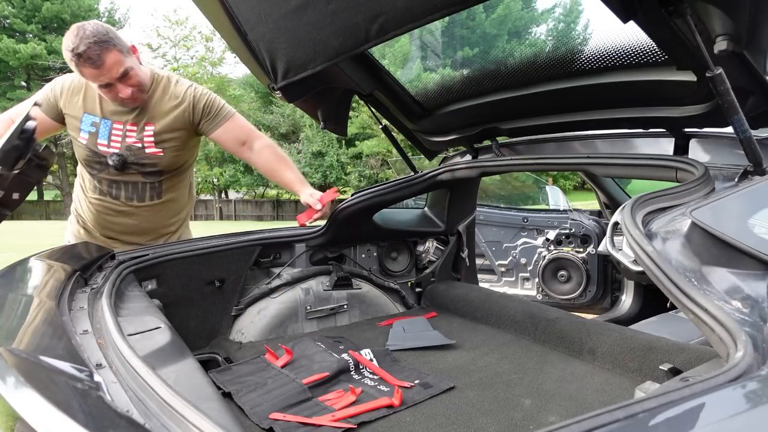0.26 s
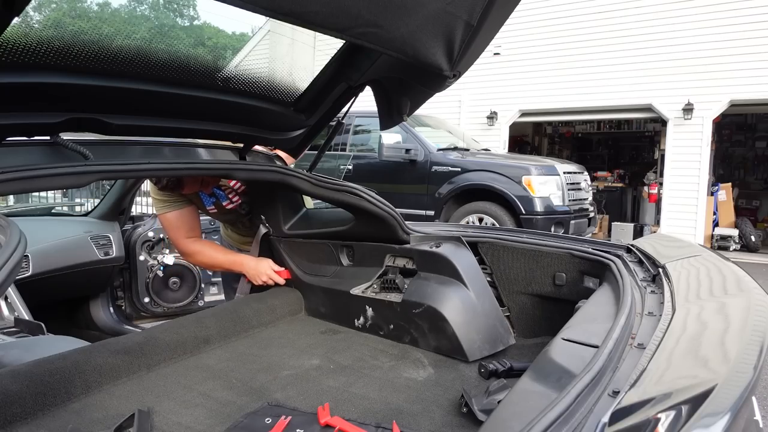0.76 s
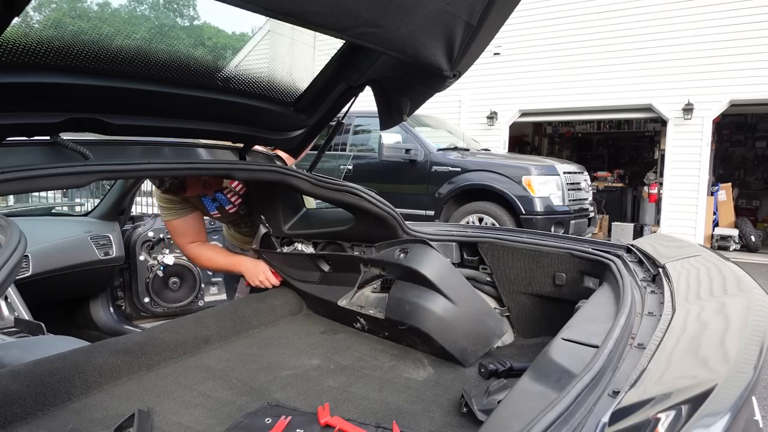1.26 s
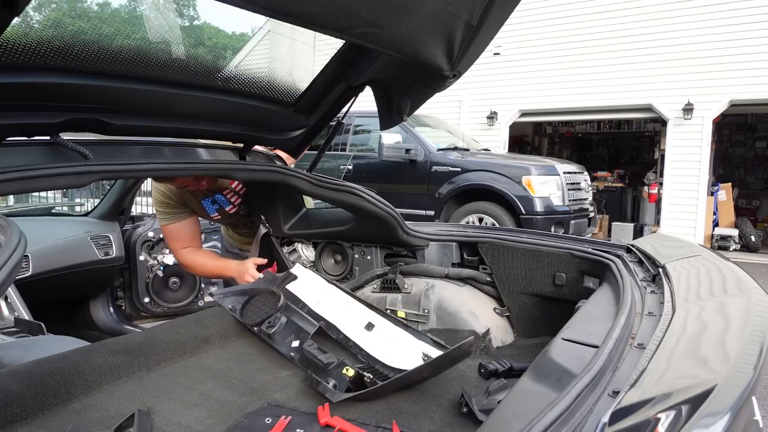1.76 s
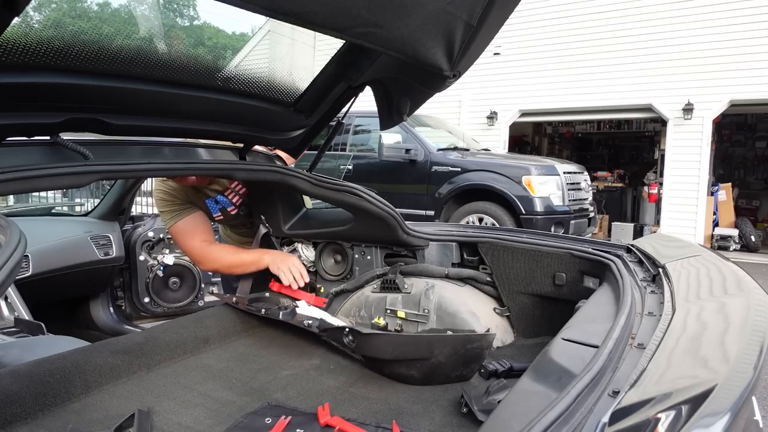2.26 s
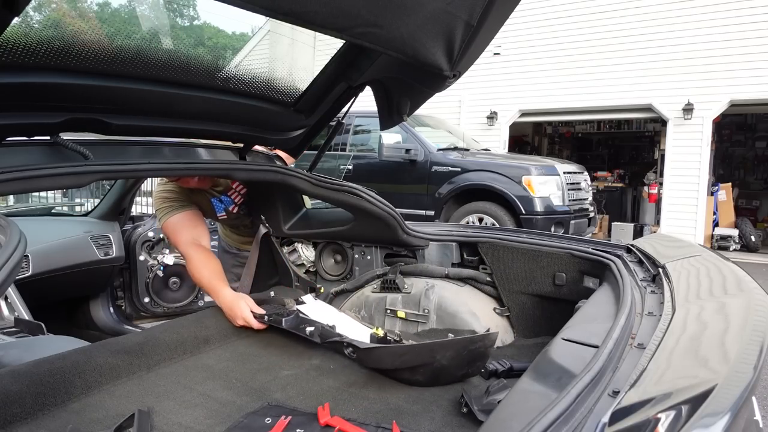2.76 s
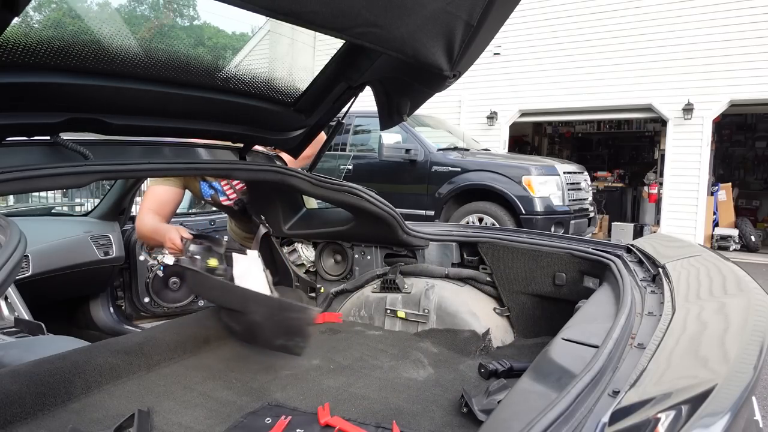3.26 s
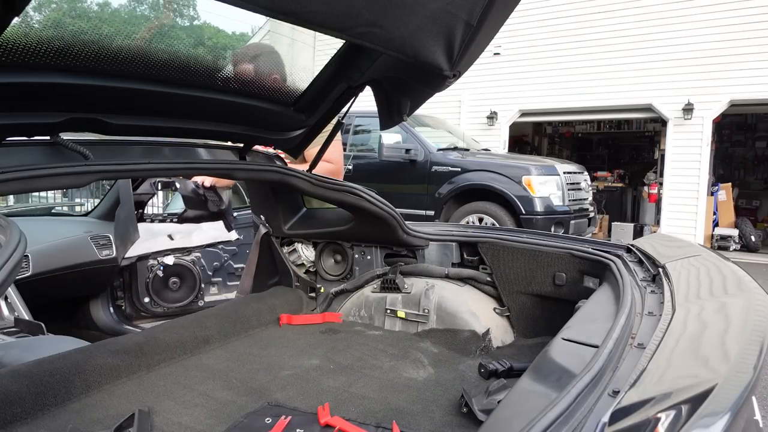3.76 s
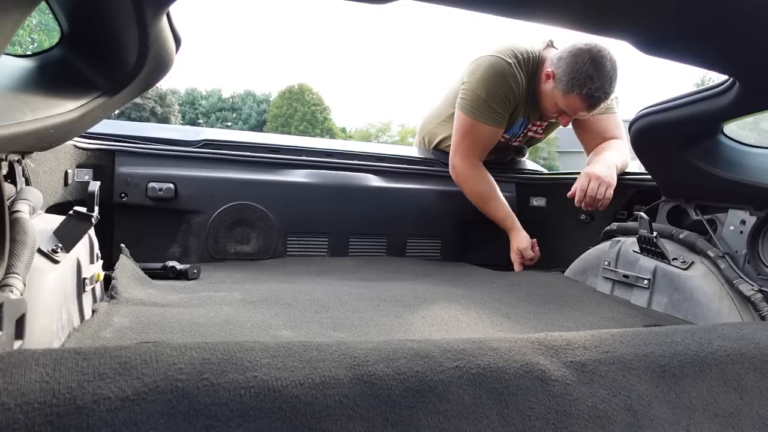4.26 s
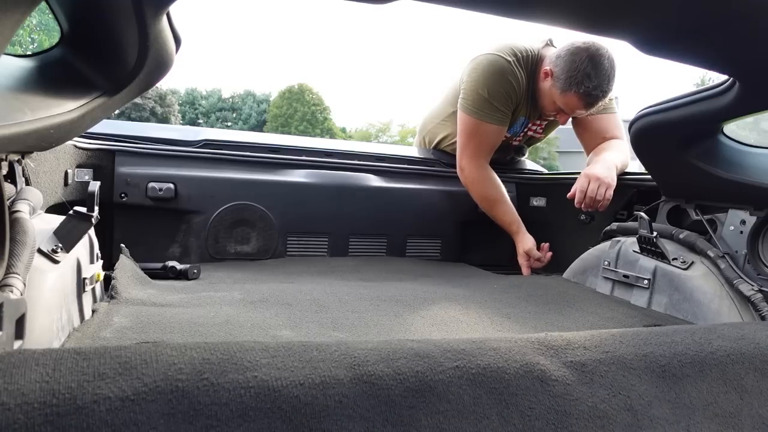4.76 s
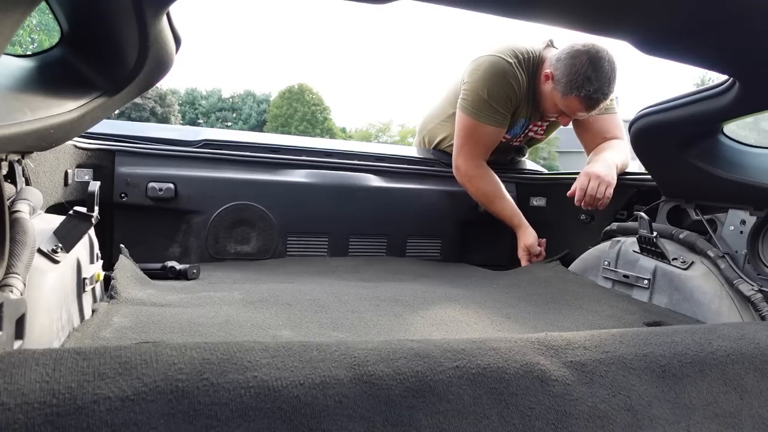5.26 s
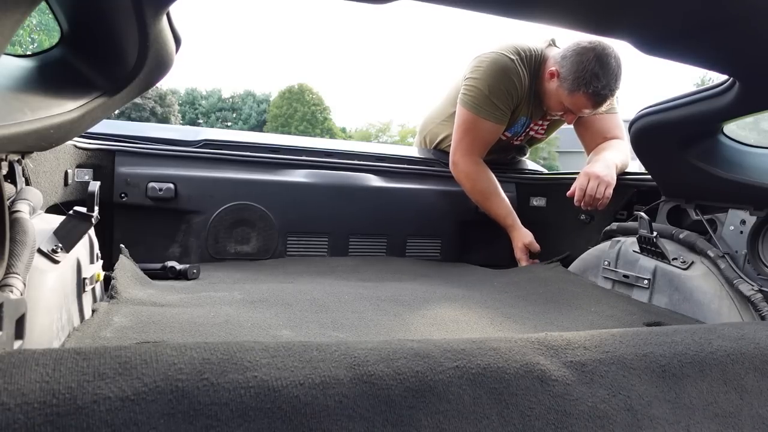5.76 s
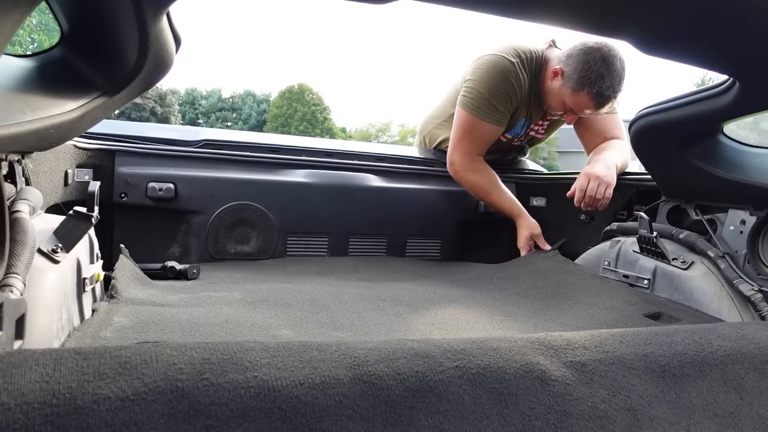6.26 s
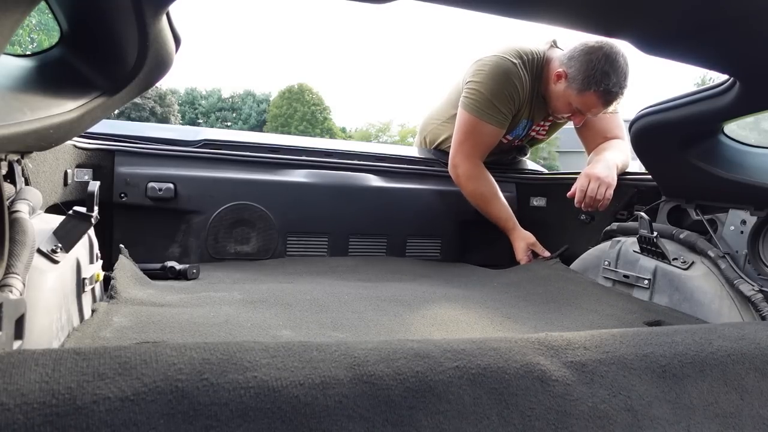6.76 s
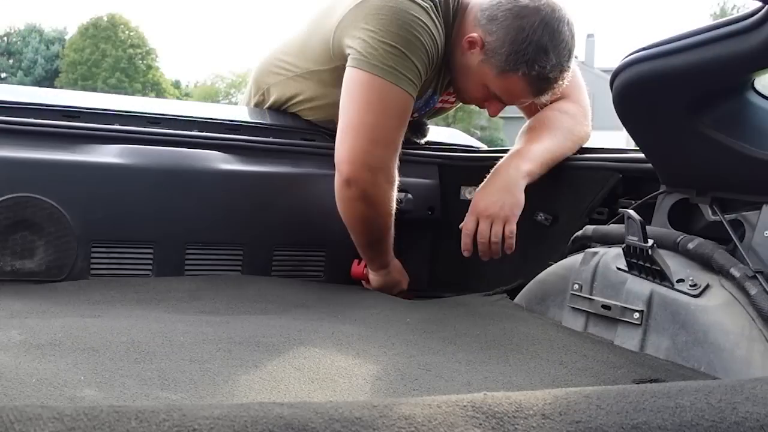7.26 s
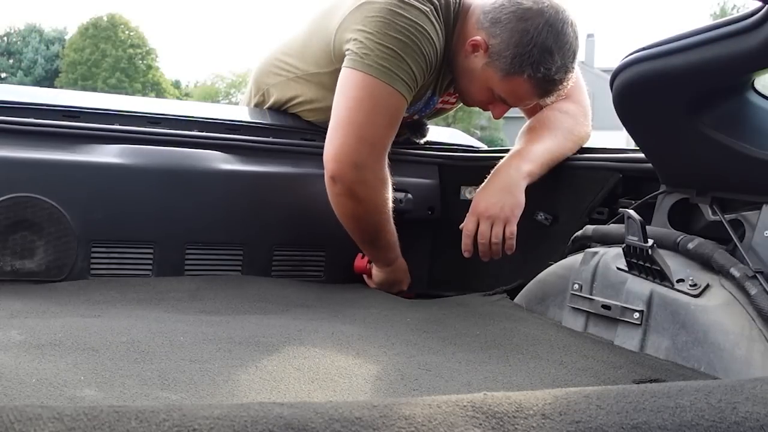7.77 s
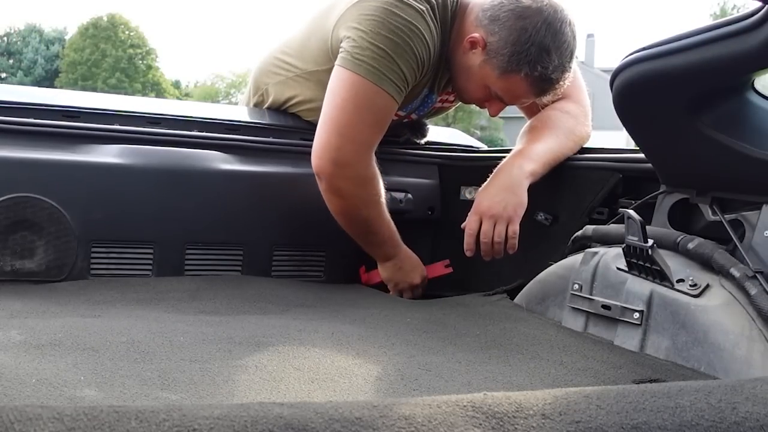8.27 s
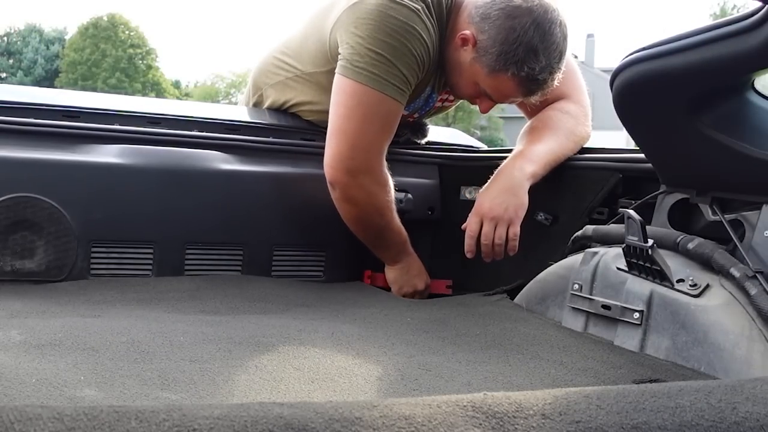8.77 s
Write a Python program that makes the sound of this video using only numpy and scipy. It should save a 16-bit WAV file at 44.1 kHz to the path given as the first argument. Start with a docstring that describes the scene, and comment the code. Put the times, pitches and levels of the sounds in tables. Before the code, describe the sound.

Plastic trim panels knock, crack and scrape loose in an open car boot, over faint traffic hum, thin crickets, then swelling cicada buzz.

```python
"""Outdoors on a driveway: tyre hum, rumble, rustling and thin crickets are faint until the level jumps up at
0.38 s. By hand, plastic trim panels are prised out of an open car boot: blows ring panel modes, clips snap as
noise cracks through the resonances of thin edges, and from 1.2 s edges scuff in jerky strokes of noise slips.
After each blow the rustle and traffic swell, then sink back. From 4 s the crickets give way to cicadas, noise
in narrow resonances, which surge after 7 s. The boot adds a short tail, and short echoes colour the scuffs and
the background."""
import sys
import numpy as np
from scipy import signal
from scipy.fft import rfft, irfft, next_fast_len
from scipy.io import wavfile

SR = 44100
rng = np.random.default_rng(int(sys.argv[2]) if len(sys.argv) > 2 else 0)


def generate_wav(signal):
    """Clip the signal to [-1, 1] and save it as 16-bit WAV at the path in sys.argv[1]."""
    frames = np.transpose(np.atleast_2d(signal))
    scaled = np.clip(frames, -1, 1) * 32767
    pcm = np.round(scaled).astype(np.int16)
    wavfile.write(sys.argv[1], SR, pcm)


N = 397782

# Resonances of thin plastic edges. Each row: frequency in Hz, width in Hz, level in dB.
PLASTIC = [(1500, 410, 4.5), (2604, 1470, 4), (3450, 1130, 8), (4100, 480, 7), (4690, 1420, 1.5),
           (5920, 660, 2.5), (6920, 880, -0.5), (8840, 1700, -2), (11400, 4300, -6.5), (14800, 1500, -19.5)]


def amp(db):
    """dB to gain."""
    return 10 ** (np.asarray(db) / 20)


def rms_one(x):
    """Scale to rms 1."""
    return x / np.sqrt(np.mean(x ** 2) + 1e-20)


def in_time(rows):
    """Curve columns at every sample; silent outside the rows."""
    s, *columns = np.transpose(rows)
    return [np.interp(np.arange(N) / SR, s, c, left=-150, right=-150) for c in columns]


def ramp(start_s, length_s):
    """A straight fade from 0 to 1."""
    return np.clip((np.arange(N) / SR - start_s) / length_s, 0, 1)


def drift(rate_hz):
    """Slow random wander of rms 1: noise through two equal poles, at a fortieth of the sample rate."""
    r = np.exp(-2 * np.pi * rate_hz * 40 / SR)
    noise = rng.standard_normal(N // 40 + 2002)
    slow = signal.lfilter([1], [1, -2 * r, r * r], noise)[2000:]   # skip the filter's settling
    return np.interp(np.arange(N) / 40, np.arange(len(slow)), rms_one(slow))


def coloured(spectrum):
    """Noise shaped by a spectrum of (Hz, dB per Hz) points; rms 1."""
    size = next_fast_len(N)
    hz = np.maximum(np.arange(size // 2 + 1) * SR / size, 1)
    at_hz, db = np.transpose(spectrum)
    gain = amp(np.interp(np.log(hz), np.log(at_hz), db))
    return rms_one(irfft(rfft(rng.standard_normal(N), size) * gain, size)[:N])


def band(x, low_hz, high_hz):
    """Causal band-pass."""
    return signal.sosfilt(signal.butter(2, [low_hz, high_hz], "band", fs=SR, output="sos"), x)


def resonate(x, peaks, centre_hz=4000, tilt_db=0, spread=9):
    """Parallel resonances, tilted per octave and favoured within a spread in octaves of a centre."""
    out = 0
    for k, (hz, width_hz, level_db) in enumerate(peaks):
        r = np.exp(-np.pi * width_hz / SR)
        octaves = np.log2(hz / centre_hz)
        gain = amp(level_db + tilt_db * octaves - 12 * (octaves / spread) ** 2)
        gain = (-1) ** k * gain   # neighbours in opposite polarity
        zeros = gain * (1 - r * r) / 2 * np.array([1, 0, -1])
        poles = [1, -2 * r * np.cos(2 * np.pi * hz / SR), r * r]
        out = out + signal.lfilter(zeros, poles, x)
    return out


def add(out, s, sound, peak_db):
    """Lay a sound of the given peak into out at s seconds."""
    i = round(s * SR)
    out[i:i + len(sound)] += (amp(peak_db) * sound / np.max(np.abs(sound)))[:N - i]


def traffic(swell_db):
    """Tyre hum around 1 kHz over a lumpy engine rumble, both coloured noise under wandering levels."""
    # The street before any swell. Each row: time in seconds, tyre hum in dB, rumble in dB.
    street = [(0, -59, -52), (1.0, -60.5, -51), (3.3, -62, -53), (3.6, -72, -60), (3.85, -67.5, -74),
              (4.1, -66.5, -62.5), (4.6, -61, -50), (5.9, -57.5, -54.5), (6.8, -57, -57.5),
              (9.02, -61, -51)]
    # Colours of the early hum, the late hum and the rumble. Each row: frequency in Hz, level in dB per Hz.
    early_hum_colour = [(210, -40.5), (350, -29.5), (401, 0.5), (606, -11.5), (815, 5), (1030, 2.5),
                        (1450, 1.5), (3000, -47), (6600, -120)]
    late_hum_colour = [(250, -26), (480, -44), (720, -5.5), (1050, 7), (1800, -1.5), (2300, -17),
                       (6600, -120)]
    rumble_colour = [(24, -39), (40, -13), (134, -4.5), (219, -17.5), (399, -22), (554, -21), (780, -25.5),
                     (1320, -120)]

    swell_shares = [[0.24], [0.28]]   # dB of hum and of rumble per dB of blow
    hum_db, rumble_db = in_time(street) + swell_db * swell_shares
    hum_wander, lumps = amp(1.2 * drift(8)), amp(2.2 * drift(9))
    late = ramp(7.1, 0.047)   # the hum quickly changes colour
    hum = np.sqrt(1 - late) * coloured(early_hum_colour) + np.sqrt(late) * coloured(late_hum_colour)
    return amp(hum_db) * hum_wander * hum + amp(rumble_db) * lumps * coloured(rumble_colour)


def rustle(swell_db):
    """Fine grains of noise, each band stirring a little on its own; a brightness curve lifts the treble."""
    # Rustle before any swell. Each row: time in seconds, level in dB, extra treble in dB.
    movement = [(0, -69, 19.5), (.65, -75, 17), (.8, -75.5, -1.5), (1.1, -67.5, 11), (2.2, -68.5, 8),
                (3.1, -75.5, 15.5), (3.7, -71.5, 6.5), (3.9, -83, 20), (4.2, -61.5, 7), (5.4, -56.5, 10.5),
                (6.2, -53, 7.5), (6.45, -56, 9.5), (7.2, -57.5, 9.5), (9.02, -63, 14.5)]
    # Early colour, then late colour. Each row: frequency in Hz, level in dB per Hz.
    early_colour = [(900, -34.5), (1600, -38), (1950, 1), (2500, 4), (3000, 0), (5600, -11), (7200, -18.5),
                    (7700, -12), (16000, -18.5)]
    late_colour = [(880, -6.5), (1500, 6.5), (1800, -4), (2380, -3.5), (2890, -9), (5300, -18.5),
                   (10300, -29), (15000, -29.5)]

    swell_shares = [[0.14], [0.11]]   # dB of level and of brightness per dB of blow
    level_db, bright_db = in_time(movement) + swell_db * swell_shares
    late = ramp(4, 0.035)   # the rustle quickly changes colour
    # two unrelated sets of grains, taken in turn so that neighbouring bands differ
    grains = [(1 - late) * coloured(early_colour) + late * coloured(late_colour) for k in range(2)]
    edges_hz = np.geomspace(1400, 17000, 19)
    bright_shares = np.clip(np.log2(edges_hz / 3000) / 1.06, 0, 1)   # none below 3 kHz, all an octave up
    stir_db, together = 2.4, drift(6)
    out = np.zeros(N)
    for k in range(len(edges_hz) - 1):
        stirring_db = stir_db * (drift(10) + together / 2)
        gain = amp(level_db + bright_shares[k] * bright_db + stirring_db)
        out += gain * band(grains[k % 2], *edges_hz[k:k + 2])
    return out


def crickets():
    """Two crickets each hold one narrow band of noise: the higher flickers, the lower sings in pulses."""
    # Each row: time in seconds, higher cricket in dB, lower cricket in dB.
    song = [(0, -66, -95), (.9, -79.5, -100), (1.7, -74.5, -89.5), (2.3, -75, -99), (3.0, -89, -90),
            (3.3, -75, -78), (3.8, -77, -75), (4.15, -82, -95), (4.3, -102, -106)]
    # Higher, then lower cricket. Each row: frequency in Hz, width in Hz, level in dB.
    voices = [(7900, 300, 0), (7490, 200, 0)]

    chirps_per_s, chirp_db = 16, 7.5   # mean rate; swing either way
    high, low = (rms_one(resonate(resonate(rng.standard_normal(N), [peak]), [peak])) for peak in voices)
    high_db, low_db = in_time(song)
    cycle = np.cumsum(chirps_per_s * (1 + 0.11 * drift(4.6))) / SR
    chirps_db = chirp_db * np.sin(2 * np.pi * cycle)
    return amp(high_db + 3.6 * drift(22)) * high + amp(low_db + chirps_db) * low


def cicadas():
    """A rough noise buzz in body resonances, each wandering in level; two bands throb."""
    # The chorus before its throb and late singers. Each row: time in seconds, level in dB.
    loudness = [(4.0, -77.5), (4.3, -65), (6.0, -65.5), (6.85, -80), (7.05, -61), (7.3, -49), (7.7, -48),
                (8.3, -48.5), (8.6, -47.5), (9.02, -45.5)]
    # Body resonances of the singers. Each row: frequency in Hz, width in Hz, level in dB.
    singer_bands = [(4315, 380, 6.5), (4830, 450, 3), (5710, 450, 5.5), (6390, 170, 11.5), (6820, 500, 11),
                    (7130, 160, 5.5), (8070, 600, -2), (9220, 170, 2.5), (9800, 600, -6)]

    throb_per_s, throb_db = 7.3, 1.5   # mean rate; swing either way
    buzz = rng.standard_normal(N) * amp(0.88 * drift(120))
    chorus = np.zeros(N)
    for peak in singer_bands:
        voice = resonate(resonate(buzz, [peak]), [(*peak[:2], 0)])   # twice through, for steeper sides
        chorus += amp(1.96 * drift(6.4)) * voice
    chorus = rms_one(chorus)
    cycle = np.cumsum(throb_per_s * (1 + 0.1597 * drift(0.87))) / SR
    throb = amp(throb_db * np.sin(2 * np.pi * cycle)) - 1
    throbbing = throb * (band(chorus, 6200, 7400) + band(chorus, 4020, 4410))
    shriller = ramp(8.1, 1.6) * band(chorus, 7700, 9300)   # shriller singers join late
    return amp(in_time(loudness)[0]) * (chorus + throbbing + shriller)


def thuds():
    """Each blow rings the modes of panel and boot floor, favouring those around its centre."""
    # Panel blows, before the boot's tail. Each row: start in seconds, peak in dB, centre in Hz,
    # fall above the centre in dB per octave.
    blows = [(0.383, -31.5, 134, 9), (0.729, -25.5, 226, 14), (0.751, -26, 354, 9.5),
             (0.828, -33.5, 400, 22), (1.068, -7, 238, 4), (1.084, -9.5, 216, 10.5), (1.499, -13.5, 270, 4),
             (1.535, -16, 377, 12), (1.599, -19.5, 530, 21), (1.628, -12.5, 199, 11),
             (1.651, -19.5, 148, 28), (1.689, -13.5, 550, 12.5), (1.741, -22, 170, 11),
             (1.842, -33, 117, 16), (2.162, -28, 336, 22), (2.295, -34.5, 130, 28),
             (2.3362, -14.5, 446, 3.5), (2.344, -12, 387, 8), (2.437, -29.5, 220, 10),
             (2.49, -9, 394, 11.5), (2.551, -24.5, 218, 19), (2.665, -34.5, 500, 27),
             (2.689, -20.5, 134, 12.5), (2.97, -31.5, 148, 15), (3.143, -17.5, 217, 32),
             (3.153, -25.5, 215, 15), (3.516, -35.5, 408, 23.5), (4.316, -9.5, 344.4, 16),
             (4.325, -5, 136, 10), (4.5, -37.5, 610, 16), (4.572, -38, 530, 17), (4.643, -15.5, 139, 8),
             (4.647, -20.5, 344, 10), (4.866, -34.5, 156, 8.5), (4.953, -20, 370, 8), (4.96, -9.5, 145, 11),
             (5.089, -35.5, 460, 44), (5.167, -27, 298, 9), (5.209, -32.5, 297, 8), (5.317, -11, 447, 8),
             (5.334, -19, 146, 33), (5.574, -7, 536, 11), (5.585, -10.5, 990, 30),
             (5.598, -10.5, 209, 12.5), (5.623, -13, 138, 22), (5.81, -38, 400, 19),
             (5.887, -28.5, 304, 9.5), (5.949, -31.5, 450, 9), (6.827, -44.5, 393, 22),
             (7.5259, -8.5, 1120, 4.5), (7.528, -7, 303, 8.5), (7.538, -6.5, 149, 12), (7.578, -22, 258, 6),
             (7.685, -36.5, 550, 18), (7.759, -33, 144, 11.5), (7.909, -33, 186, 9), (8.038, -26, 360, 44),
             (8.061, -37, 400, 2), (8.115, -26.5, 440, 16), (8.147, -30.5, 142, 9), (8.345, -27, 220, 26),
             (8.401, -30.5, 164, 19), (8.521, -28.5, 490, 20), (8.598, -32, 178, 9.5),
             (8.688, -32, 380, 23), (8.818, -33, 137, 7), (9.008, -23, 344, 10)]
    # Modes of panel and boot floor. Each row: frequency in Hz, level in dB, share of the blow's ring time.
    modes = [(105, -14, 1.5), (140.6, -8.5, 1.34), (170.6, -10.5, 1.57), (202.5, -6, 1.16),
             (254, -3.5, 0.9), (297.8, -8, 1.2), (343, -2.5, 0.7), (406.5, 1, 0.77), (472.3, -4.5, 1.01),
             (555.7, 1.5, 0.61), (644, 4, 0.44), (758, 1.5, 0.64), (915.5, -2, 0.59), (989, 9, 0.27),
             (1094, -7.5, 1.1), (1281, 1, 0.69), (1425, 3, 0.47), (1780, -5, 0.56), (2350, 7.5, 0.23),
             (2664, 5, 0.3)]

    t60_s, shorter_per_10_db = 0.083, 0.79   # ring time of a -20 dB blow; factor for harder ones
    out, t = np.zeros(N), np.arange(SR // 4) / SR
    hz, level_db, share = np.array(modes).T[:, :, None]
    for s, peak_db, centre_hz, fall_db in blows:
        blow_t60_s = t60_s * shorter_per_10_db ** ((peak_db + 20) / 10)   # harder blows press the panel down
        octaves = np.log2(hz / centre_hz)
        contact_s = 0.00016 * max(fall_db, 1)   # a duller blow is a softer, longer contact
        slope_db = np.minimum(14 * octaves, -fall_db * octaves)
        struck_db = level_db + slope_db + rng.normal(0, 2, hz.shape)
        detuned_hz = hz * (1 + 0.023 * rng.standard_normal(hz.shape))   # slightly, at random, at every blow
        rise = rng.choice([-1, 1], hz.shape) * (1 - np.exp(-t / contact_s)) ** 2
        decay = amp(struck_db - 60 * t / (blow_t60_s * share))
        rings = rise * decay * np.sin(2 * np.pi * detuned_hz * t)
        add(out, s, rings.sum(axis=0), peak_db)
    return out


def snaps():
    """A sharp crack, then a spray of noise dying away, all ringing the thin edges; metal clips ring as sines."""
    # Clips and edges snapping. Each row: start in seconds, peak in dB, tilt in dB per octave.
    cracks = [(0.386, -38.5, 9), (1.068, -6.5, 8), (1.4993, -24, -28), (1.6896, -15, -1), (2.3363, -29, 12),
              (4.316, -22.5, 2), (4.648, -25, -9), (4.954, -29.5, -2), (5.3175, -14.5, 0.5),
              (5.575, -5, 1.5), (5.5861, -2, 0), (5.592, -19, 7), (5.6085, -12, -1), (5.634, -30, -3),
              (5.889, -23.5, -4.5), (5.95, -31, -5.5), (7.5255, -4, 8), (7.5782, -25.5, -9.5),
              (7.9238, -31, -10), (8.116, -21.5, -4.5), (9.0103, -15.5, -0.5)]
    # Metal clips ringing on. Each row: start in seconds, frequency in Hz, peak in dB, 60 dB decay in seconds.
    pings = [(1.689, 3050, -18.5, 0.011), (1.09, 4200, -40, 0.11)]

    rise_s, crack_t60_s = 0.0001, 0.0074
    spray_db, spray_t60_s = -10.5, 0.056   # level against the crack
    out, t = np.zeros(N), np.arange(SR // 6) / SR
    for s, peak_db, tilt_db in cracks:
        crack = amp(-60 * t / crack_t60_s)
        spray = amp(spray_db - 60 * t / spray_t60_s)
        burst = rng.standard_normal(len(t)) * (1 - np.exp(-t / rise_s)) * (crack + spray)
        add(out, s, resonate(burst, PLASTIC, tilt_db=tilt_db), peak_db)
    for s, hz, peak_db, t60_s in pings:
        ring = amp(-60 * t / t60_s) * (1 - np.exp(-t / 0.0043)) * np.sin(2 * np.pi * hz * t)
        add(out, s, ring, peak_db)
    return out


def scuffs():
    """Dense uneven slips in jerks under a stroke that swells and stops; each also rings at its own centre."""
    # Edges dragged over carpet and plastic, before jerks and echoes. Each row: start in seconds, peak in dB,
    # centre in Hz, length in seconds, spread in octaves, hiss against the body in dB.
    strokes = [(1.164, -37, 4000, 0.097, 1.1, 1), (1.273, -40.5, 4000, 0.11, 0.95, 2),
               (1.485, -36.5, 2000, 0.05, 1.8, -10.5), (1.52, -36, 3970, 0.026, 1, -15),
               (1.574, -36, 3800, 0.078, 1.2, -13), (1.627, -33, 4530, 0.018, 0.78, -7),
               (1.643, -41, 3500, 0.059, 1.3, -11), (1.732, -45, 3500, 0.048, 1.4, -10),
               (2.317, -31.5, 2400, 0.04, 0.86, -15), (2.425, -36.5, 3280, 0.025, 0.92, 4),
               (2.4896, -23.5, 4260, 0.005, 0.8, 16), (2.552, -44, 3000, 0.012, 0.93, 16),
               (2.588, -43, 4000, 0.019, 1, 22), (2.652, -48, 5400, 0.28, 0.15, -14),
               (2.655, -40.5, 4000, 0.06, 0.72, 0), (2.815, -39.5, 4800, 0.062, 0.73, -1),
               (2.96, -49, 3960, 0.057, 1, 11), (3.132, -26, 3360, 0.061, 0.98, -2.5),
               (3.192, -43, 3000, 0.13, 0.56, -6), (3.303, -35, 2900, 0.047, 1, -13),
               (3.51, -33.5, 3500, 0.047, 1.5, 0.5), (3.862, -50, 10880, 0.35, 0.25, -14),
               (4.31, -31, 5030, 0.037, 1.2, -8), (5.043, -33, 2800, 0.17, 2, -5),
               (5.092, -31.5, 3180, 0.017, 0.77, -3), (5.146, -25, 3500, 0.1, 2.6, -3),
               (5.182, -20, 4300, 0.0084, 1.5, -10), (5.206, -30, 4300, 0.014, 1.3, 5),
               (5.29, -14.5, 3300, 0.055, 2.8, -5.5), (5.533, -32.5, 3680, 0.066, 0.31, -7),
               (5.809, -39.5, 3180, 0.034, 1.1, -38), (8.682, -33, 1830, 0.025, 1.46, -18),
               (8.808, -38, 2450, 0.013, 0.77, -20), (8.984, -29.5, 4500, 0.087, 2, -4)]

    edge_s, treble_hz = 0.051, 7500   # longest rise or release; the hiss lies above this pitch
    scatter_hz, scatter_db = 80, 6.5   # each stroke favours its own bands
    out, jerks = np.zeros(N), amp(1.97 * drift(74))
    t = np.arange(SR // 3) / SR
    steep = signal.cheby1(4, 1, treble_hz, "high", fs=SR, output="sos")
    for s, peak_db, centre_hz, length_s, spread, treble_db in strokes:
        unevenness = amp(4.2 * np.minimum(rng.exponential(1, len(t)), 5))
        slips = rng.standard_normal(len(t)) * unevenness
        pressure = np.clip(np.minimum(t, length_s - t) / min(length_s / 2, edge_s), 0, 1)
        scatter = rng.standard_normal((len(PLASTIC), 3)) * [scatter_hz, 0, scatter_db]
        own_ring = (centre_hz, 0.55 * spread * centre_hz, 1.5)
        peaks = [*(np.array(PLASTIC) + scatter), own_ring]
        body = rms_one(resonate(slips, peaks, centre_hz, spread=spread))
        hiss = rms_one(band(signal.sosfilt(steep, slips), treble_hz / 2, 12350))
        add(out, s, (body + amp(treble_db) * hiss) * np.sin(np.pi / 2 * pressure), peak_db)
    return signal.lfilter(*signal.iirnotch(6580, 4.0, SR), out * jerks)   # rubbing lacks one band


def swell(blows):
    """How far the latest blow, sinking steadily, still stands over the threshold, in dB."""
    from_db, sinks_db_per_s = -41, 74.5
    sink_db = sinks_db_per_s * np.arange(N) / SR
    blow_db = 20 * np.log10(np.abs(blows) + 1e-9)
    held_db = np.maximum.accumulate(blow_db + sink_db) - sink_db
    return np.maximum(held_db - from_db, 0)


def short_echoes(x):
    """Three short echoes colour a sound."""
    # Short echoes. Each row: delay in seconds, level in dB.
    echoes = [(.0031, -19.5), (.0058, -12.5), (.0097, -21.5)]
    return x + sum(amp(echo_db) * np.pad(x, (round(s * SR), 0))[:N] for s, echo_db in echoes)


def boot(x):
    """The open boot answers with a short, dull, diffuse tail of decaying noise."""
    t60_s, level_db, cut_hz = 0.14, -18.5, 2000
    t = np.arange(SR // 3) / SR
    tail = rng.standard_normal(len(t)) * amp(-60 * t / t60_s) * (t > 0.004)
    tail = signal.sosfilt(signal.butter(1, cut_hz, fs=SR, output="sos"), tail)
    tail = tail / np.sqrt(np.sum(tail ** 2))
    return x + amp(level_db) * signal.fftconvolve(x, tail)[:N]


def scene():
    """Handwork in the boot over the outdoor bed, which is coloured by the short echoes too."""
    blows = thuds() + snaps()
    swell_db = swell(blows)
    bed = short_echoes(traffic(swell_db) + rustle(swell_db) + crickets() + cicadas())
    before_jump = np.arange(N) / SR < 0.382
    bed = amp(-23 * before_jump) * bed   # dB down before the jump
    handwork = boot(blows + short_echoes(scuffs()))
    return (handwork + bed)[None]


def record(dry):
    """The small microphone drops the deep bass; the top is cut, 60 dB down from 16.3 kHz."""
    thin = signal.sosfilt(signal.butter(4, 75, "high", fs=SR, output="sos"), dry)
    return signal.sosfilt(signal.cheby2(16, 60, 16300, fs=SR, output="sos"), thin)


dry = scene()
out = record(dry)
generate_wav(out)
```